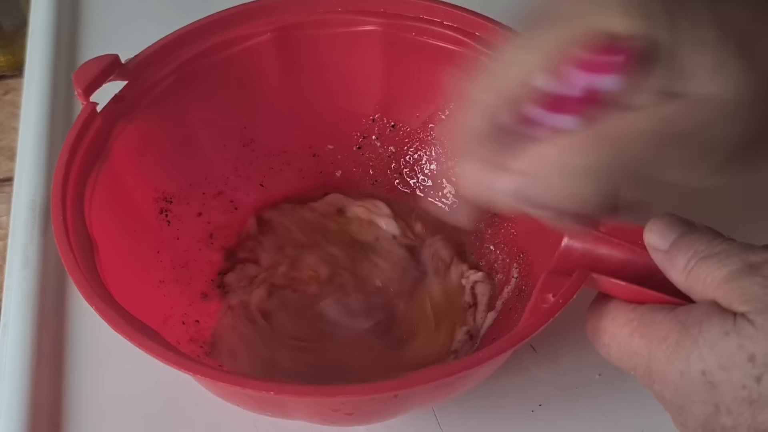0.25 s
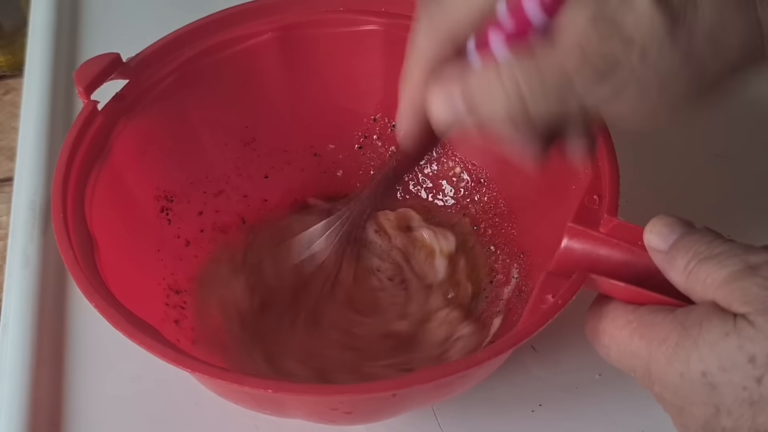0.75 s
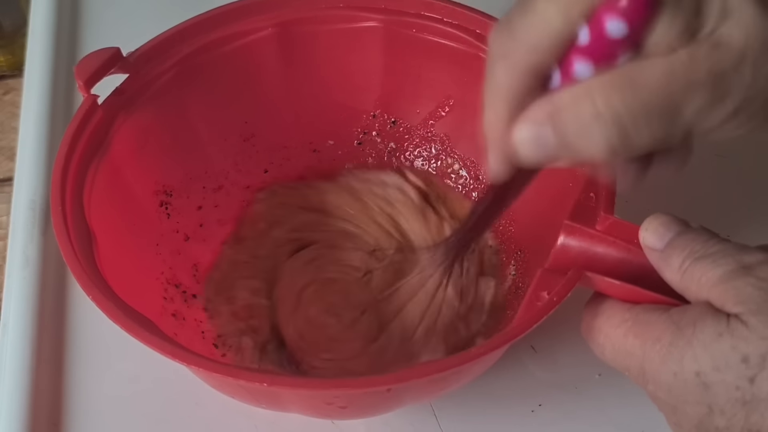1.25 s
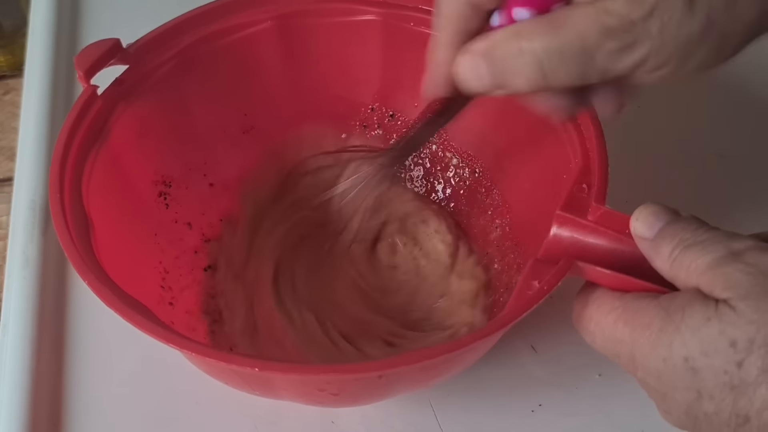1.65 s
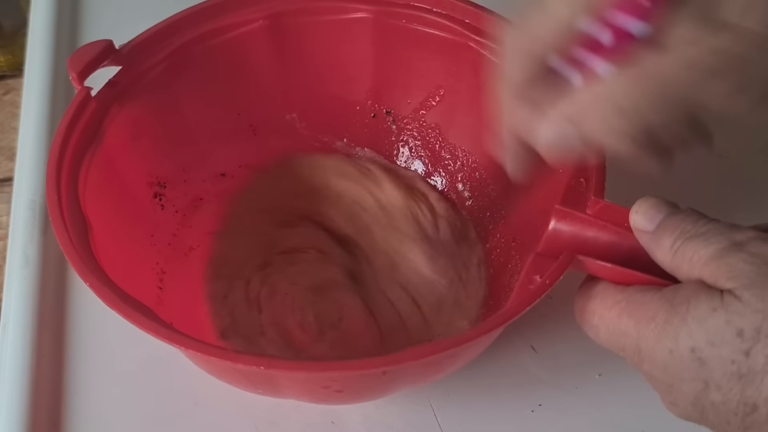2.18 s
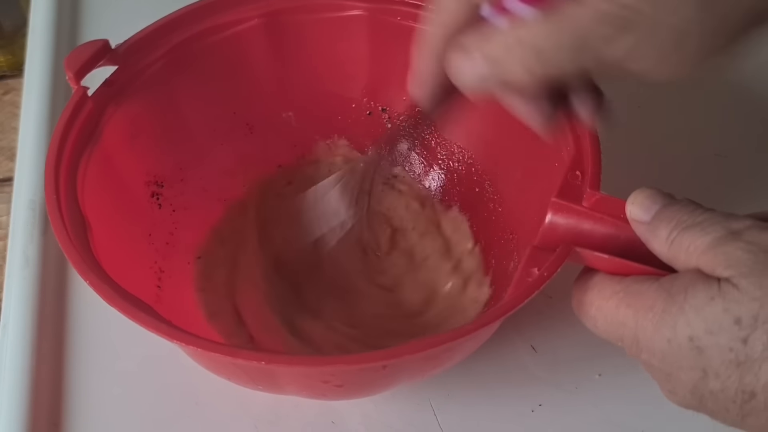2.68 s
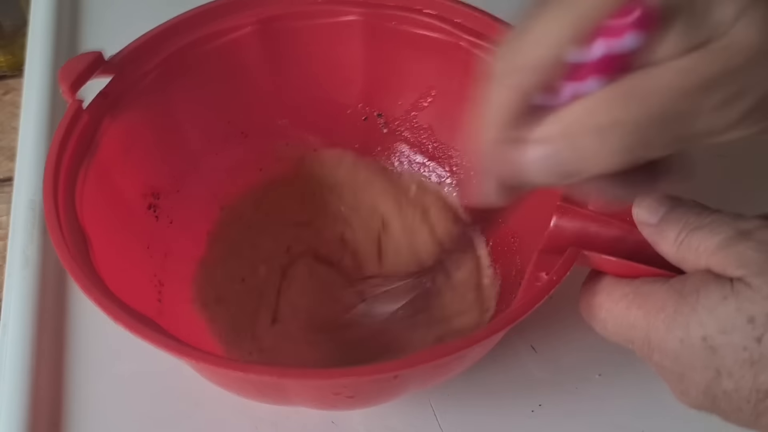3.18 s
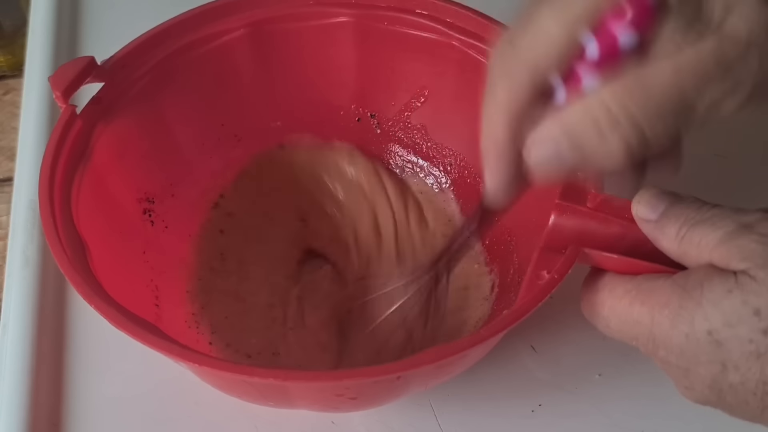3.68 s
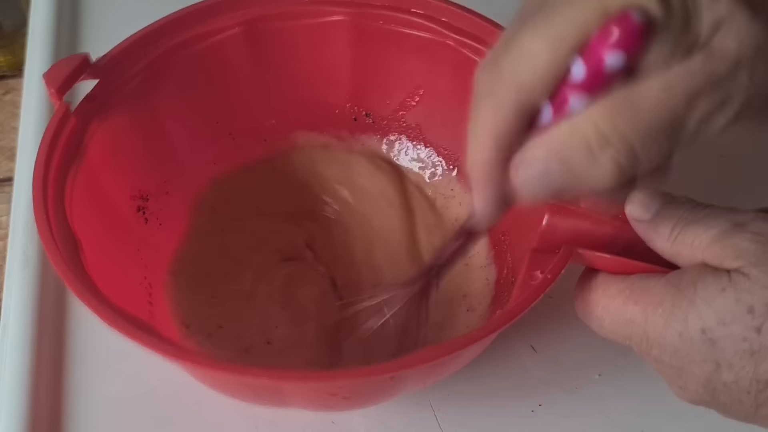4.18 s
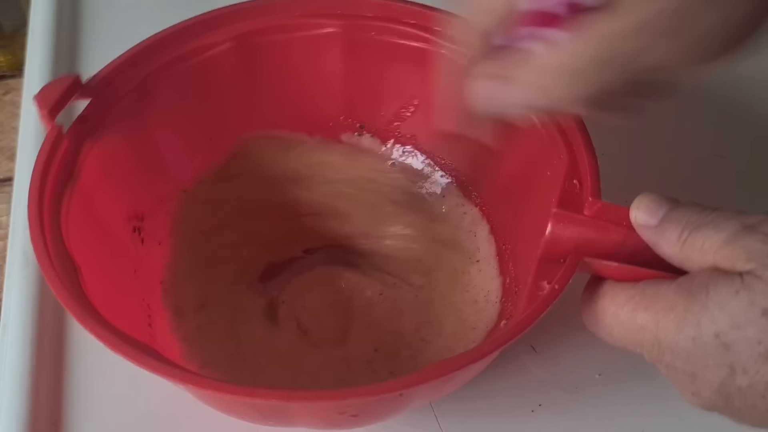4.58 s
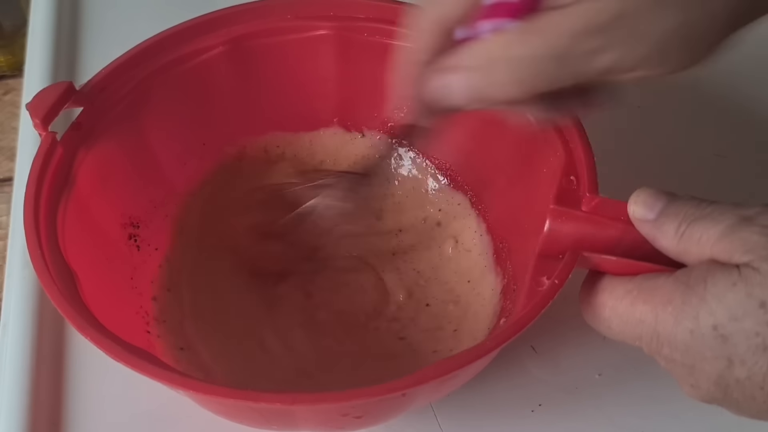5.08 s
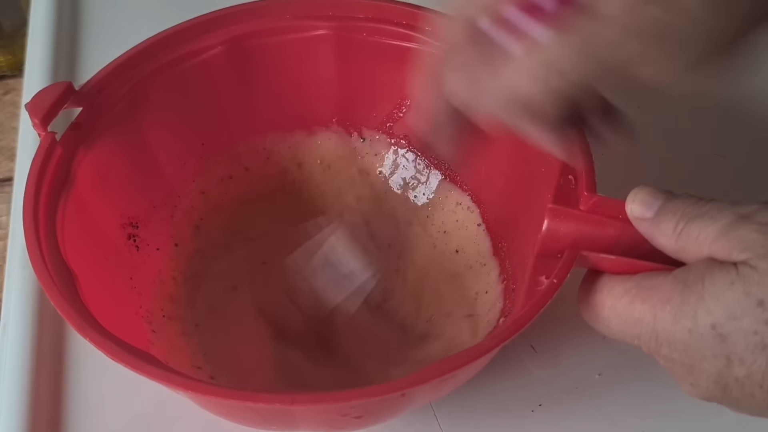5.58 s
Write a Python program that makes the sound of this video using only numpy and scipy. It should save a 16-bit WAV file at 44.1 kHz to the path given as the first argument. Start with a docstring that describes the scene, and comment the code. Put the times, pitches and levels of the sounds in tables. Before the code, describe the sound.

Close stereo sound of whisking in a home kitchen. Thin wires swish through thick wet batter and tick against a plastic bowl that answers with short hollow clacks. Early on it is lumpy, squelchy and crackling; the middle is smoother with a few gulps; then strong knocks come in clusters after four seconds. The bowl shudders low on the counter, the room adds only a short thin tail.

```python
"""A wire whisk beats a runny batter in a plastic bowl on a kitchen counter, several sweeps a second.
Wires knock and chatter on the wall (sparse random forces through the bowl's modes); between knocks they swish
(grains of noise shaped by a wet outline, with pops and slaps). Lumps squelch, mostly early and now and then
later, and folds slosh and gulp: clusters of gliding sines. The bowl rocks and rumbles on the counter;
a short, thin, bright tail is the kitchen."""
import sys
import numpy as np
from scipy import signal
from scipy.fft import rfft, irfft, next_fast_len
from scipy.io import wavfile
from scipy.ndimage import uniform_filter1d

SR = 44100
rng = np.random.default_rng(int(sys.argv[2]) if len(sys.argv) > 2 else 0)


def dump_mix(stems):
    """Bounce the given channels to the path in sys.argv[1] as a 16-bit WAV at rate SR."""
    frames = np.atleast_2d(stems).T  # one column per channel
    limited = np.clip(frames, -1, 1)  # hard clip at full scale
    pcm = np.round(limited * 32767).astype(np.int16)
    wavfile.write(sys.argv[1], SR, pcm)


N = 257544
T = np.arange(N) / SR
LN_1000 = np.log(1000)  # exp(-LN_1000 * t / t60) falls 60 dB in t60

# wires meeting the wall; levels are relative:
# start_s, drag_ms, hollow_hz (loaded bowl), spot_hz (struck spot), body_db, clack_db, tick_db
WALL_KNOCKS = [(0.035, 3.7, 580, 1400, -36, -29.5, -42.5), (0.153, 14, 850, 1250, -32, -29, -46),
               (0.199, 4.2, 840, 1800, -35, -34.5, -32), (0.257, 1.4, 620, 1380, -35, -30, -42),
               (0.377, 11, 620, 1710, -37, -35.5, -49), (0.386, 1.3, 727, 1330, -29.5, -29.5, -40),
               (0.647, 3, 840, 1440, -28.5, -33, -34.5), (0.658, 10, 426, 3750, -32, -36, -35.5),
               (0.806, 12.6, 620, 1950, -39, -30.5, -54), (0.893, 13.3, 690, 1750, -40, -35, -32),
               (1.024, 22, 766, 1810, -42, -29.5, -62), (1.092, 15.5, 790, 2080, -40, -37.5, -36),
               (1.581, 2.2, 640, 2170, -44, -35, -33), (1.657, 0.38, 394, 1540, -33.5, -22.5, -39),
               (1.734, 2, 550, 1300, -33, -29.5, -35), (1.766, 1.2, 420, 1570, -36.5, -33, -39),
               (1.814, 0.7, 760, 1700, -37, -34.5, -47), (2.124, 2, 880, 2850, -40, -28, -34),
               (2.13, 7.7, 865, 1830, -37, -33.5, -43), (2.541, 1.8, 614, 2190, -39, -35, -37.5),
               (2.62, 1.8, 690, 1810, -41, -36, -41.5), (2.733, 1.3, 570, 1154, -26.5, -30.5, -40),
               (2.758, 1.4, 713, 2470, -36, -28, -29), (2.826, 8.2, 483, 2090, -37, -30, -36.5),
               (2.965, 8.2, 410, 1880, -32.5, -31.5, -32.5), (3.016, 3.3, 593, 1390, -45, -34, -67),
               (3.172, 6.3, 670, 2920, -28, -25, -26.5), (3.201, 10.4, 564, 2120, -37, -35, -34.5),
               (3.336, .7, 530, 3070, -55, -51, -33), (3.38, 3.4, 410, 2360, -30, -28, -29),
               (3.282, 4.7, 570, 1180, -37, -37.5, -53), (3.734, 3, 570, 1130, -39, -33.5, -47),
               (3.776, 7.5, 414, 2170, -28.5, -26, -30), (3.783, 5.4, 770, 2140, -28.5, -28.5, -30.5),
               (3.821, 12, 494, 2510, -47, -33, -35), (3.827, 3.1, 956, 2900, -24.5, -22.5, -19.5),
               (4.011, 2.6, 608, 2040, -15, -14, -25), (4.017, 1.2, 557, 1310, -19.5, -32, -38),
               (4.028, 8.3, 620, 2670, -48, -41, -41), (4.08, 2.8, 860, 2060, -37, -34, -29),
               (4.084, 3.5, 900, 2820, -29.5, -30, -25), (4.111, 2, 582, 1155, -18, -19.5, -29),
               (4.116, 1, 600, 1120, -25, -38, -33), (4.132, 1.8, 810, 1920, -40, -35, -33),
               (4.193, 16, 543, 2450, -39.5, -34.5, -31.5), (4.241, 3, 600, 1730, -54, -35, -41),
               (4.361, 1.6, 582, 1610, -17.5, -22.5, -29.5), (4.379, 1, 882, 2630, -25.5, -22, -23.5),
               (4.385, 3, 910, 2900, -32, -28, -28), (4.392, 7, 825, 4260, -48, -29, -35),
               (4.407, 0.65, 540, 1360, -18, -21.5, -24.5), (4.411, 4, 576, 1410, -21, -25, -33),
               (4.437, 0.48, 804, 2470, -39, -25.5, -30), (4.493, 1.5, 494, 2640, -37.5, -37.5, -37),
               (4.537, 11.6, 787, 2250, -31, -33, -40.5), (4.622, 0.8, 590, 1400, -23.5, -19.5, -32.5),
               (4.638, 6.4, 530, 1330, -36, -34, -34), (4.696, 0.6, 380, 2550, -52, -37.5, -32),
               (4.824, 2.3, 620, 1550, -24, -29, -34.5), (4.835, 12, 395, 2440, -37, -32.5, -34.5),
               (4.869, 4.3, 562, 1120, -24, -44, -36), (4.892, 6.3, 840, 1480, -30, -34, -31.5),
               (4.928, 3.2, 835, 1900, -42, -36, -33.5), (5.122, 10, 527, 1130, -30, -39, -31),
               (5.151, 0.81, 362, 2220, -33.5, -28.5, -26.5), (5.18, 3.4, 525, 1410, -22.5, -27, -42),
               (5.205, 1.3, 596, 2180, -50, -33, -37), (5.295, 0.98, 760, 1550, -51, -31, -37),
               (5.327, 17, 590, 980, -26.5, -31.5, -34), (5.464, 10, 577, 2070, -34.5, -46, -36),
               (5.529, 19.4, 580, 1530, -25.5, -25, -33), (5.606, 2, 790, 2150, -25, -21, -24.5),
               (5.612, 6.1, 716, 2020, -23, -28.5, -31), (5.634, 7.1, 560, 1410, -35, -30.5, -35),
               (5.703, 8, 323, 1360, -32.5, -35, -46), (5.795, 14, 487, 1230, -33.5, -32, -43)]
# whisk sweeping through the batter: peak_s, length_ms, level_db (relative), depth_db (extra body)
WHISK_SWEEPS = [(0.058, 9.4, -45, 11), (0.275, 48, -40, -2.5), (0.44, 30, -42, 5.5), (0.69, 85, -54, 17),
                (0.79, 58, -42.5, 0), (0.93, 94, -46.5, -2), (1.16, 160, -43, -3.5), (1.391, 45, -44.5, 2),
                (1.549, 140, -42, -0.5), (1.669, 30, -42, 1), (1.765, 49, -41, 4), (1.925, 47, -41, -3),
                (2.15, 20, -36, -1.5), (2.262, 12, -49.5, -11), (2.405, 27, -58, 18), (2.5, 280, -52, -8.5),
                (2.601, 150, -48, 1.5), (2.785, 45, -39, -2.5), (2.897, 29, -36.5, 0.5),
                (3.015, 12, -62, 13.5), (3.1, 41, -52, 8), (3.19, 26, -44, -10), (3.285, 31, -37.5, 5),
                (3.41, 106, -37.5, -0.5), (3.485, 30, -39.5, 2), (3.604, 68, -37.5, 3),
                (3.69, 54, -51.5, 13.5), (3.751, 75, -44, -9.5), (3.961, 60, -36.5, 0),
                (4.109, 170, -42.5, 0), (4.25, 40, -44.5, -1), (4.335, 33, -37, 3.5),
                (4.564, 26, -38, -7.5), (4.643, 59, -45.5, -8), (4.905, 170, -40, -2.5),
                (5.115, 27, -35.5, 3.5), (5.192, 17, -35.5, -5.5), (5.38, 15, -62, 12),
                (5.485, 27, -36.5, 0), (5.64, 51, -37, -3), (5.72, 23, -42.5, 1), (5.815, 58, -35.5, -1)]
# fine wet hiss of wires in batter: freq_hz, level_db
WET_OUTLINE = [(100, -15), (170, -0.5), (350, 0), (700, -11), (1000, -9.5), (1900, 6.5), (2500, 0.5),
               (3300, 2), (4500, -4.5), (5600, -5.5), (7000, -11), (8000, -19.5), (11000, -22),
               (15500, -35.5)]


def undb(db):
    """Decibels to gain."""
    return 10 ** (np.asarray(db) / 20)


def rms(x):
    """Root mean square over all channels."""
    return np.sqrt(np.mean(x ** 2)) + 1e-12


def gains(points, size):
    """Interpolate a (Hz, dB) outline over log frequency, as dB on the bins of a transform."""
    hz, db = np.transpose(points)
    bin_hz = np.arange(size // 2 + 1) * SR / size
    return np.interp(np.log(bin_hz + 1), np.log(hz), db)


def colour(x, points, share=1):
    """Causal minimum-phase filter with the given (Hz, dB) outline, its dB scaled by share."""
    cepstrum = irfft(np.log(undb(share * gains(points, size=8192))))
    half = len(cepstrum) // 2
    folded = np.r_[cepstrum[0], 2 * cepstrum[1:half], np.zeros(half)]
    response = irfft(np.exp(rfft(folded)))
    return signal.fftconvolve(np.atleast_2d(x), response[None], axes=1)[:, :x.shape[-1]]


def registers(x):
    """Split a sound into the bowl's hollow body, the wall's clack and the wires' tick."""
    low_hz, middle_hz, high_hz = 115, 900, 3000

    def cut(v, hz, kind):
        sos = signal.butter(2, hz, kind, fs=SR, output="sos")
        return signal.sosfilt(np.tile(sos, (2, 1)), v)

    body = cut(cut(x, low_hz, "high"), middle_hz, "low")
    upper = cut(x, middle_hz, "high")
    return [body, cut(upper, high_hz, "low"), cut(upper, high_hz, "high")]


def ring(x, response):
    """Play a force through a response by convolution."""
    return signal.fftconvolve(np.atleast_2d(x), response, axes=1)[:, :x.shape[-1]]


def walk(rate_hz):
    """Smoothed random steps, scaled to an rms of 1."""
    k = max(2, int(SR / rate_hz))
    steps = np.repeat(rng.standard_normal(N // k + 1), k)
    smooth = uniform_filter1d(steps, k)[:N]
    return smooth / rms(smooth)


def add(out, sound, start_s):
    """Mix a sound in at its start time."""
    i = max(0, int(start_s * SR))
    out[:, i:i + sound.shape[1]] += sound[:, :N - i]


def place(x):
    """The right side hears more of the treble."""
    # freq_hz, left_minus_right_db
    side_outline = [(200, -2), (380, -2.5), (700, 2), (1300, 1.5), (2400, 0), (4400, -5), (6500, -5),
                    (8500, -1), (11000, -4.5), (15000, -26.5)]
    return np.vstack([colour(x[0], side_outline, 1 / 2), colour(x[1], side_outline, -1 / 2)])


def sweep(peak_s, length_ms):
    """Wires speed up, then slow down: a bell of power, half as strong at the ends of its length."""
    return 0.5 ** np.minimum((2 * (T - peak_s) * 1000 / length_ms) ** 2, 100)


def lumpiness():
    """1 for lumpy batter, falling to 0 as it blends."""
    blend_s = 2.1
    return np.clip(1 - (T / blend_s) ** 4, 0, 1)


def hiss(level_db=-63.5):
    """Faint steady white hiss of the microphones."""
    return undb(level_db) * rng.standard_normal((2, N))


def kitchen(x, wet_db):
    """Counter, tiles and cupboards return a short, thin, bright tail: decaying noise, convolved."""
    t, t60_s, build_s = T[:SR // 2], .22, 0.0083
    onset = np.clip(t / build_s - .5, 0, 1)
    tail = rng.standard_normal((2, len(t))) * np.exp(-LN_1000 * t / t60_s) * onset
    tail = colour(tail, [(200, -41), (2000, -10), (14000, -6)])
    tail = tail / np.sqrt(np.sum(tail ** 2) / 2)
    return undb(wet_db) * signal.fftconvolve(x, tail, axes=1)[:, :N]


def rumble(level_db, throb_db, apart_db=-10):
    """The arm shakes bowl and counter: low noise, mostly common to both sides."""
    # shudder: freq_hz, level_db
    counter_outline = [(15, -43), (30, -13), (45, -1.5), (60, -1), (75, -4.5), (110, -14.5), (165, -10.5),
                       (220, -19.5), (400, -31), (1500, -60)]
    # shaking: time_s, level_db (relative)
    shake_curve = [(0.0, -50), (0.18, -55), (0.3, -49), (0.56, -51.5), (0.72, -52), (0.8, -49),
                   (0.96, -49.5), (1.2, -47), (1.38, -56.5), (1.66, -52), (2.6, -52.5), (3.6, -51),
                   (4.5, -53), (5.84, -53.5)]
    mid, side = colour(rng.standard_normal((2, N)), counter_outline)
    shake = mid + undb(apart_db) * np.array([side, -side])
    shake = shake / np.sqrt(uniform_filter1d(mid ** 2, SR // 8))  # even out its own swells
    curve_db = np.interp(T, *np.transpose(shake_curve))
    return shake * undb(level_db + curve_db + throb_db * walk(3.96))


def rocks(level_db, waver=0.0715):
    """Each shove of the arm swells one wavering low note of the bowl on the counter."""
    # bumps of the held bowl: peak_s, length_ms, pitch_hz (before waver), level_db (relative)
    bumps = [(0.05, 58, 161, -46.5), (0.275, 40, 159, -44.5), (0.265, 45, 240, -43.5),
             (0.355, 73, 60.5, -39.5), (0.49, 39, 60.5, -41), (0.485, 31, 162, -44.5),
             (0.86, 71, 59, -41.5), (0.91, 26, 255, -45), (1.255, 31, 58, -41.5), (1.29, 52, 167.3, -49.5),
             (1.53, 16, 150, -46), (1.59, 36, 61.9, -44), (1.715, 18, 67, -41.5), (1.745, 19, 160, -42),
             (2.97, 13, 177, -50.5), (3.6, 41, 179.3, -46), (4.018, 18, 165, -40), (4.115, 14, 165, -42),
             (4.367, 16, 168.6, -44), (4.413, 16, 164.5, -41), (4.625, 12, 166.2, -39),
             (5.545, 30, 165, -36.5), (5.64, 35, 158.8, -45), (5.81, 32, 186, -45.5)]
    warped_s = np.cumsum(1 + waver * walk(40)) / SR
    out = 0
    for peak_s, length_ms, hz, db in bumps:
        swell = np.sqrt(2 * sweep(peak_s, length_ms))
        out = out + undb(db + level_db) * swell * np.sin(2 * np.pi * hz * warped_s)
    return out


def thuds(level_db, follow=0.5):
    """A knock jolts the bowl on the counter: a dull noise burst growing more slowly than the knock."""
    out, t, t60_s = np.zeros((2, N)), T[:5000], 0.009
    for start_s, _, _, _, body_db, _, _ in WALL_KNOCKS:
        jolt = rng.standard_normal(len(t)) * np.exp(-LN_1000 * t / t60_s)
        thud = colour(jolt, [(40, -8.5), (90, -4.0), (165, -7.0), (280, -5), (800, -44.5)])
        add(out, thud / rms(thud) * undb(level_db + follow * body_db), start_s)
    return out


def bowl(wall_db, wall_t60_s, scatter_db, hollow_hz=575, spot_hz=2000, spot_db=-9, crack=0.71, crack_ms=0.91):
    """Response to one touch: batter load sets the hollow note; each spot reweights the modes and rings."""
    # filled bowl: freq_hz, t60_s, energy_db, left_lead_rad
    bowl_modes = [(173, 0.083, -22, 1), (251, 0.034, -11, -1.5), (276, 0.032, -7, -1.5),
                  (405, 0.076, -6.5, 1.1), (574, 0.06, -3.5, 0.16), (789, 0.042, -0.5, 1.87),
                  (1118, 0.037, -8.5, 0.8), (1283, 0.04, -6.5, 1.5), (1470, 0.031, -8, 1),
                  (1842, 0.026, -7.5, -1), (2078, 0.033, -3, 2.5), (2450, 0.005, -10, 5),
                  (2820, 0.014, -0.5, 4.5), (3830, 0.007, -8, 3.5), (4060, 0.0094, -4.5, 3.5),
                  (5294, 0.013, -2, 11)]
    # crowd of weaker modes: freq_hz, level_db
    wall_outline = [(100, -3), (300, -14.5), (600, 1.5), (1000, -7), (2000, -5.5), (3200, -4.5), (4100, -3),
                    (4700, -9), (5600, -5), (7000, -6.5), (8000, -16.5), (11000, -18), (15500, -31)]
    build_cycles = 0.47  # a mode needs time to spread round the bowl
    t = T[:4000]
    hollow = (hollow_hz, 0.04, 5.5, 1.0)
    spot = (spot_hz, .026, spot_db, 1)
    hz, t60_s, db, lead = np.transpose([*bowl_modes, hollow, spot])[:, :, None]
    weight, detune, side = rng.uniform(-1.5, 1.5, (len(hz), 3)).T[:, :, None]
    weight[-2:] = 0  # hollow and spot keep their levels
    # moving batter loads the wall and shifts its modes a little
    phase = 2 * np.pi * hz * (1 + 0.016 * detune) * t
    fade = np.sign(side) * undb(db + scatter_db * weight) * np.exp(-LN_1000 * t / t60_s) / np.sqrt(t60_s)
    fade = fade * (1 - np.exp(-t * hz / build_cycles))
    modes = np.array([(fade * np.sin(phase + k * lead / 2)).sum(0) for k in (1, -1)])
    # weaker modes blur into a crack and a short rasp
    dying = np.exp(-LN_1000 * t / wall_t60_s) + crack * np.exp(-1000 * t / crack_ms)
    crowd = colour(rng.standard_normal((2, len(t))) * dying, wall_outline)
    return modes / rms(modes) + undb(wall_db) * crowd / rms(crowd)


def squelches(level_db, spread, cycles, glide, size_db, tear_db, count=7):
    """A lump squashed between wires bursts into tiny gliding air pockets while its wet skin tears."""
    # start_s, length_ms, pitch_hz (centre), level_db (relative)
    lump_bursts = [(0.089, 16, 1770, -38), (0.122, 19.5, 1950, -40), (0.242, 8, 1490, -36),
                   (0.283, 29, 1400, -38), (0.407, 12, 1310, -37), (0.519, 30, 2030, -39),
                   (0.742, 19, 1900, -39), (0.825, 10.3, 1530, -35.5), (0.948, 8.1, 1280, -38),
                   (1.019, 18, 1870, -35.5), (1.04, 15, 1620, -34), (1.168, 25.6, 1770, -39),
                   (1.339, 9.8, 1937, -42.5), (1.45, 18.6, 1880, -41), (1.99, 10, 1754, -41),
                   (2.261, 9.4, 1991, -39), (2.31, 9, 1730, -41), (3.422, 12, 1820, -37.5),
                   (5.025, 13.6, 1507, -35), (5.236, 7.8, 1087, -36), (5.278, 11.6, 1380, -35)]
    out, t = np.zeros((2, N)), T[:3000]
    for start_s, length_ms, centre_hz, db in lump_bursts:
        length_s = length_ms / 1000
        delay, pitch, size, lead = rng.uniform(-1, 1, (count, 4)).T[:, :, None]
        delay_s = length_s * (np.arange(count)[:, None] + abs(delay)) / count
        hz, age_s = centre_hz * np.exp(spread * pitch), np.maximum(t - delay_s, 0)
        life = age_s * hz / cycles
        phase = 2 * np.pi * hz * age_s * (1 + glide * np.minimum(life, 1))
        fade = undb(size_db * size) * (age_s > 0) * np.exp(-LN_1000 * life)
        pockets = np.array([(fade * np.sin(phase + k * lead)).sum(0) for k in (1, -1)])
        skin = rng.standard_normal((2, len(t))) * (fade ** 2).sum(0)
        tear = place(colour(skin, WET_OUTLINE))
        sound = pockets / rms(pockets) + undb(tear_db) * tear / rms(tear)
        add(out, sound / rms(sound[:, :int(length_s * SR)]) * undb(db + level_db), start_s)
    return out


def sloshes(level_db, spread, cycles, glide, wall_db, small_db):
    """A fold traps one big and several small air pockets that ring and rise in pitch; batter slaps the wall."""
    # start_s, length_ms, pocket_hz (big pocket, before glide), level_db (relative)
    folds = [(0.159, 24, 885, -37), (0.43, 14.5, 920, -39), (0.586, 35, 750, -32), (0.767, 16.5, 740, -35),
             (0.947, 16.6, 870, -41), (1.324, 28, 630, -40), (1.905, 30, 740, -35.5),
             (2.061, 25, 480, -39.5), (2.38, 20, 540, -42.5), (2.445, 12, 743, -31),
             (2.695, 24, 515, -39.5), (2.885, 32, 650, -41), (3.09, 22.5, 551, -27),
             (3.104, 35, 190, -36.5), (3.26, 35, 593, -46), (3.562, 20, 545, -28.5),
             (3.568, 17.5, 326, -33.5), (3.598, 18.7, 574, -29), (4.25, 25, 430, -29.5),
             (5.326, 19.6, 520, -33), (5.374, 14, 630, -29), (5.394, 38, 263, -39.5), (5.484, 43, 614, -31),
             (5.53, 16.5, 270, -23.5), (5.568, 11.4, 750, -36), (5.586, 14, 558, -31), (5.66, 11, 746, -39),
             (5.718, 20, 322, -34)]
    # softness of the slap: freq_hz, level_db
    slap_outline = [(80, -5), (200, 6), (600, -14), (1200, -3.5), (2500, -10.5), (6000, -49)]
    out, t = np.zeros((2, N)), T[:6000]
    for start_s, length_ms, pocket_hz, db in folds:
        length_s = length_ms / 1000
        delay, pitch, size = rng.uniform((0, -1, .5), (1, 1, 1), (8, 3)).T[:, :, None]
        size = size * undb(small_db)
        delay[0], pitch[0], size[0] = 1 / 3, 0, 1  # the big pocket
        hz, age_s = pocket_hz * np.exp(spread * pitch), np.maximum(t - delay * length_s, 0)
        life_s = cycles / hz
        phase = 2 * np.pi * hz * age_s * (1 + glide * np.minimum(age_s / life_s, 1))
        fade = size * (1 - np.exp(-age_s * hz)) * np.exp(-LN_1000 * age_s / life_s)
        pockets = np.array([(fade * np.sin(phase + lead)).sum(0) for lead in (1.1, 0)])
        push = rng.standard_normal(len(t)) * np.sin(np.pi * np.minimum(t / length_s, 1))
        slap = colour(ring(push, bowl(wall_db=1.5, wall_t60_s=0.0074, scatter_db=-2.0)), slap_outline)
        sound = pockets / rms(pockets) + undb(wall_db) * slap / rms(slap)
        add(out, sound / rms(sound[:, :int(length_s * SR)]) * undb(db + level_db), start_s)
    return out


def pops(rate_hz, centre_hz, spread, cycles, glide, size_db):
    """Small air pockets burst behind the wires, each a brief blip rising in pitch."""
    out, t = np.zeros((2, N)), T[:1000]
    for start_s in rng.uniform(0, T[-1], int(rate_hz * T[-1])):
        pitch, size, lead = rng.standard_normal(3)
        hz = centre_hz * np.exp(spread * np.clip(pitch, -2, 2))
        life = t * hz / cycles
        phase = 2 * np.pi * hz * t * (1 + glide * np.minimum(life, 1))
        fade = undb(size_db * min(size, 2)) * (1 - np.exp(-t * hz)) * np.exp(-LN_1000 * life)
        add(out, fade * np.sin([phase + 0.88 + lead / 2, phase]), start_s)
    return out


def spatter(rate_hz, low_hz, high_hz, width, length_ms, size_db):
    """Flung batter lands in separate little slaps, each a wet burst ringing at a pitch of its own."""
    out, t = np.zeros((2, N)), T[:1500]
    for k in range(int(rate_hz * T[-1])):
        when, pitch, size, length = rng.random(4)
        hz = low_hz * (high_hz / low_hz) ** pitch
        burst = rng.standard_normal((2, len(t))) * np.exp(-1000 * t / (length_ms * (.5 + length)))
        burst = burst[0] + burst * np.array([[0], [1]])  # partly shared by both sides
        pocket = np.sin(2 * np.pi * hz * t) * np.exp(-np.pi * width * hz * t)
        slap = ring(burst, pocket[None])
        add(out, slap / rms(slap) * undb(size_db * size), min((k + 2 * when) / rate_hz, T[-1]))
    return out


def churn(x, depth_db, rate_hz):
    """Folds keep changing shape: each quarter-octave band of the swish swells and fades by itself."""
    size = next_fast_len(N)
    spectrum, out = rfft(x, size), 0
    bin_hz = np.arange(size // 2 + 1) * SR / size
    band = 4 * np.log2(np.clip(bin_hz, 500, 8000) / 500)
    for k in range(17):
        part = irfft(spectrum * np.maximum(1 - abs(band - k), 0), size)[:, :N]
        out = out + part * undb(depth_db * walk(rate_hz * rng.uniform(.7, 1.3)))
    return out


def stirring():
    """Gain of swish body, clack and tick: steady stirring plus sweeps, fuller the deeper the whisk dips."""
    # steady stirring: time_s, level_db (relative)
    stir_curve = [(0.0, -34.5), (0.44, -33), (1.45, -41.5), (1.69, -37), (2.05, -39), (3.22, -39),
                  (3.33, -40.5), (5.84, -36.5)]
    stir_db, sweep_db = -5.5, 0.24
    tick_loss = 1  # dB of tick lost per dB of body gained
    thickening_db_per_s = (0.5, 0, 0.25)  # body, clack, tick
    power = undb(np.interp(T, *np.transpose(stir_curve)) + stir_db) ** 2 * np.ones((3, 1))
    for peak_s, length_ms, db, depth_db in WHISK_SWEEPS:
        gain = undb(db + sweep_db + depth_db * np.array([[1], [0], [-tick_loss]]))
        power = power + gain ** 2 * sweep(peak_s, length_ms)
    return np.sqrt(power) * undb(np.outer(thickening_db_per_s, T))


def swish(body_db, clack_db, tick_db, grain_rate_hz, grain_spread_db, flutter_db, bowl_db, pops_db, slaps_db,
          lumps_db, lumpy_film_db):
    """Batter films snap between wires, grit rubs the wall, bubbles pop and drops spatter, in surges."""
    grains = rng.random(N) < grain_rate_hz / SR
    grains = grains * undb(grain_spread_db * np.minimum(rng.exponential(size=N), 4))
    force = grains * undb(flutter_db * walk(110)) * rng.choice([-1, 1], (2, N))
    film = churn(colour(force, WET_OUTLINE), depth_db=2.6, rate_hz=45)
    # the circling whisk keeps reaching a new stretch of the wall
    wall, stretch = np.zeros((2, N)), SR // 20
    for i in range(0, N, stretch):
        touch = bowl(wall_db=-2.5, wall_t60_s=0.042, scatter_db=11.5, hollow_hz=rng.uniform(421, 870),
                     spot_hz=rng.uniform(1254, 2605), spot_db=-1.5)
        add(wall, signal.fftconvolve(force[:1, i:i + stretch], touch, axes=1), i / SR)
    # batter cushions these touches
    wall = colour(wall, [(400, 0.0), (800, 6), (2200, 7.5), (5000, -2.0)])
    blips = pops(rate_hz=120, centre_hz=1718, spread=0.265, cycles=43, glide=0.08, size_db=3.5)
    slaps = spatter(rate_hz=85, low_hz=487, high_hz=4560, width=0.33, length_ms=10.7, size_db=6)
    # in lumpy batter a fine wet crackle replaces part of the even film
    lumps = spatter(rate_hz=110, low_hz=900, high_hz=5500, width=0.35, length_ms=0.9, size_db=13)
    even = film / rms(film) + undb(bowl_db) * wall / rms(wall)
    mix = even * undb(lumpy_film_db * lumpiness())
    mix = mix + undb(pops_db) * blips / rms(blips) + undb(slaps_db) * slaps / rms(slaps)
    mix = mix + undb(lumps_db) * lumpiness() * lumps / rms(lumps)
    parts = zip(registers(place(mix)), stirring(), (body_db, clack_db, tick_db))
    return sum(part / rms(part) * gain * undb(db) for part, gain, db in parts)


def bare(x, tick_over_clack_db, share=0.035, offset_db=4):
    """The more ticking a touch, the less batter cushions it and the higher its crack reaches."""
    return colour(x, [(7000, 0), (11000, 1)], share * np.clip(tick_over_clack_db + offset_db, -10, 12))


def taps(body_db, clack_db, tick_db):
    """In each sweep a wire grazes the wall, on average harder in a stronger sweep; rows as in WALL_KNOCKS."""
    scatter_s, drag_range_ms, spread_db = 0.0099, (0.67, 16), 3
    rows = []
    for peak_s, _, db, _ in WHISK_SWEEPS:
        lag, size, bright = np.clip(rng.standard_normal(3), -1.5, 1.5)
        levels = db + np.array([body_db, clack_db, tick_db])
        levels = levels + spread_db * (size + bright * np.array([-1, 0, 1]))
        start_s = min(peak_s + scatter_s * lag, T[-1])
        rows.append((start_s, rng.uniform(*drag_range_ms), rng.uniform(316, 930), rng.uniform(860, 2600),
                     *levels))
    return rows


def knocks(touches, body_db, clack_db, tick_db, catch_rate_hz, chatter, snap_ms, swell, wires_db, pan_db=-0.6):
    """A wire lands, then catches and slips on the wall: a short drag clicks, a long one swells to chatter."""
    # thin wires push little air at low pitch: freq_hz, level_db
    lean_outline = [(120, -4), (300, -4.5), (500, -0.5), (1000, 1)]
    wire_gap_ms = 3.55  # nominal, between neighbouring wires
    landing = 3.1  # first contact against later catches, before the snap factor
    out, t = np.zeros((2, N)), T[:5000]
    for start_s, drag_ms, hollow_hz, spot_hz, *levels in touches:
        drag_s, snap = max(drag_ms, .5) / 1000, np.exp(-drag_ms / snap_ms)
        catches = (rng.random(len(t)) < catch_rate_hz / SR) * rng.uniform(-0.78, 1, len(t))
        pressure = np.exp(-(t / drag_s) ** 2) * (1 - np.exp(-t / (swell * drag_s)))
        gap_ms = wire_gap_ms * rng.uniform(.7, 1.4)
        wires = undb(wires_db * (np.cos(2 * np.pi * t * 1000 / gap_ms) - .5))
        force = chatter * catches * pressure * wires
        force[0] += landing * snap
        response = bowl(wall_db=-1, wall_t60_s=0.066, scatter_db=5.0, hollow_hz=hollow_hz, spot_hz=spot_hz,
                        spot_db=4.5)
        sound = colour(place(ring(force, response)), lean_outline)
        sound = bare(sound, levels[2] - levels[1]) * undb(np.array([[pan_db], [-pan_db]]) / 2)
        contact = int((drag_s + .008) * SR)  # samples over which each register is levelled
        parts = zip(registers(sound), levels, (body_db, clack_db, tick_db))
        add(out, sum(p / rms(p[:, :contact]) * undb(db + trim_db) for p, db, trim_db in parts), start_s)
    return out


def scene():
    """Whisk, batter and bowl in the kitchen."""
    # lumpy batter holds little air, so it sounds less hollow: freq_hz, level_db
    lumpy_outline = [(130, 2), (240, -2.5), (340, -2.5), (450, -4.5), (600, 0), (2200, -0.5), (2800, -1.5),
                     (5000, -1)]
    touches = [*WALL_KNOCKS, *taps(body_db=-4.5, clack_db=-10.0, tick_db=-8.5)]
    whisk = knocks(touches, body_db=-2.0, clack_db=-0.5, tick_db=-1.5, catch_rate_hz=3000, chatter=1.0,
                   snap_ms=21.0, swell=0.25, wires_db=3.5)
    whisk = whisk + swish(body_db=-5.0, clack_db=-1.66, tick_db=-3.0, grain_rate_hz=5000, grain_spread_db=1.0,
                          flutter_db=1.68, bowl_db=-2.5, pops_db=-6.0, slaps_db=-6.5, lumps_db=-7.0,
                          lumpy_film_db=-0.5)
    whisk = whisk + sloshes(level_db=-3.0, spread=0.42, cycles=22, glide=0.18, wall_db=-2.0, small_db=-5.5)
    whisk = whisk + squelches(level_db=-0.5, spread=0.15, cycles=35, glide=0.071, size_db=-2.5, tear_db=-2.5)
    whisk = whisk + lumpiness() * (colour(whisk, lumpy_outline) - whisk)
    counter = rumble(level_db=2.0, throb_db=1.5) + rocks(level_db=-1) + thuds(level_db=-40.0)
    return whisk + kitchen(whisk, wet_db=-23.0) + counter + hiss()


def record(dry, apart_hz=280, top_hz=16000):
    """Long waves reach both microphones nearly alike; tanh rounds the loudest peaks, a low-pass cuts the top."""
    mid, side = (dry[0] + dry[1]) / 2, (dry[0] - dry[1]) / 2
    low_side = signal.sosfiltfilt(signal.butter(2, apart_hz, fs=SR, output="sos"), side)
    side = side - .8 * low_side
    rounded = np.tanh([mid + side, mid - side])
    return signal.sosfilt(signal.ellip(10, .2, 70, top_hz, fs=SR, output="sos"), rounded)


dry = scene()
out = record(dry)
dump_mix(out)
```